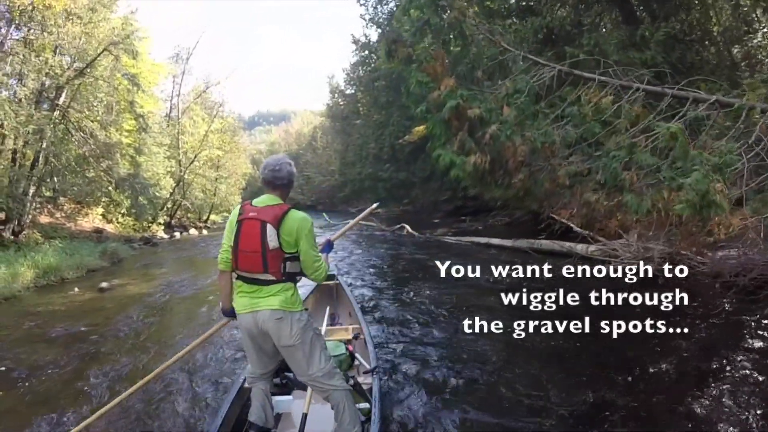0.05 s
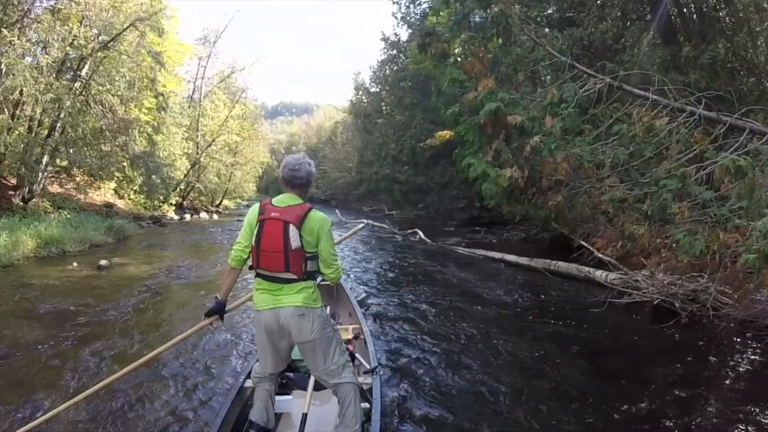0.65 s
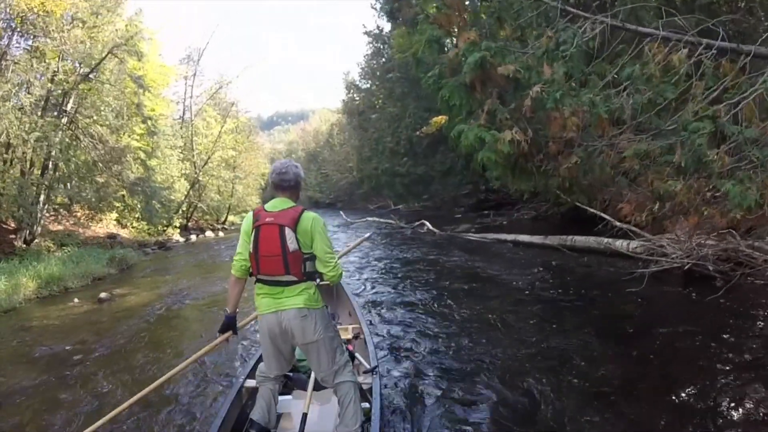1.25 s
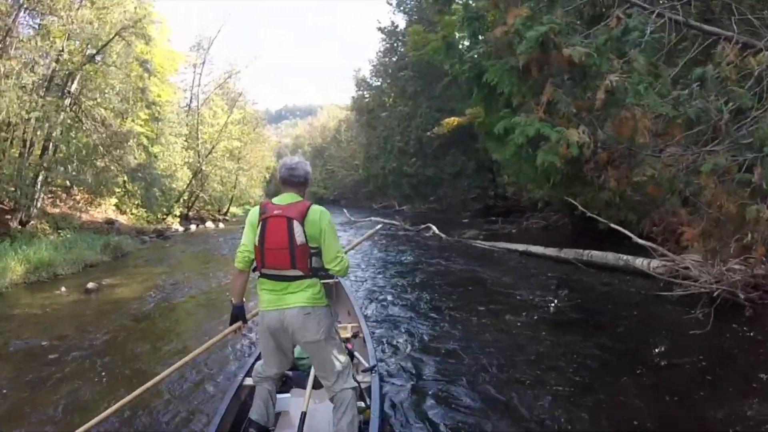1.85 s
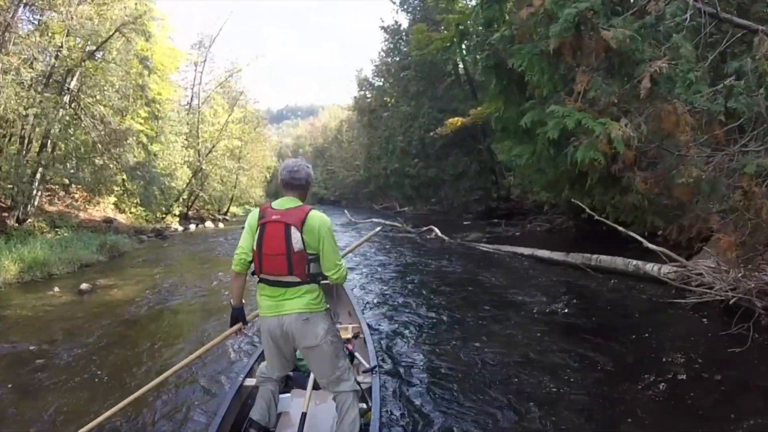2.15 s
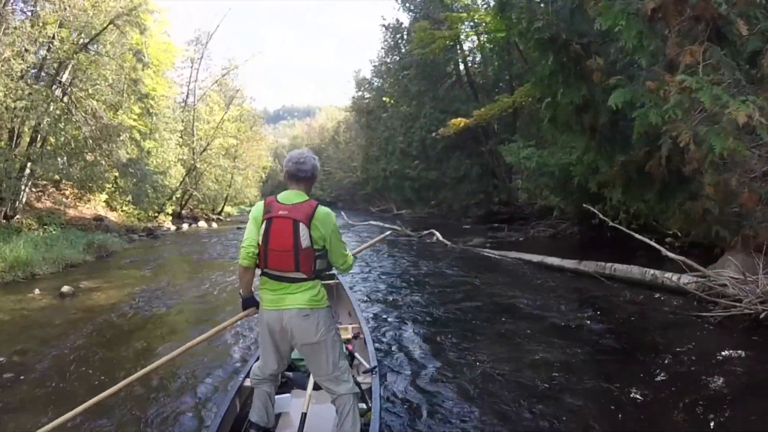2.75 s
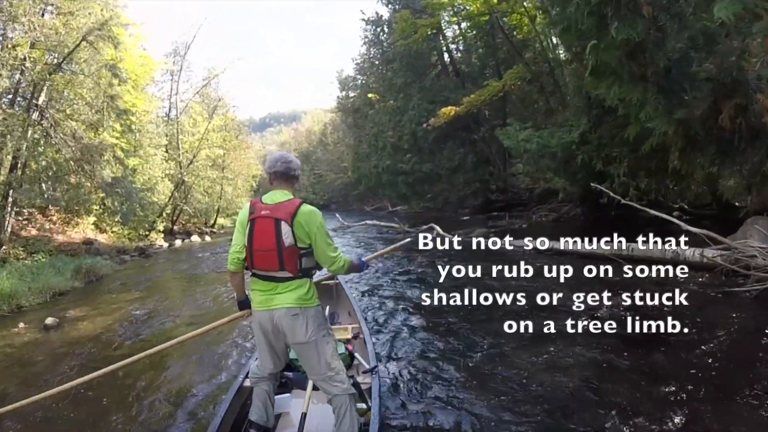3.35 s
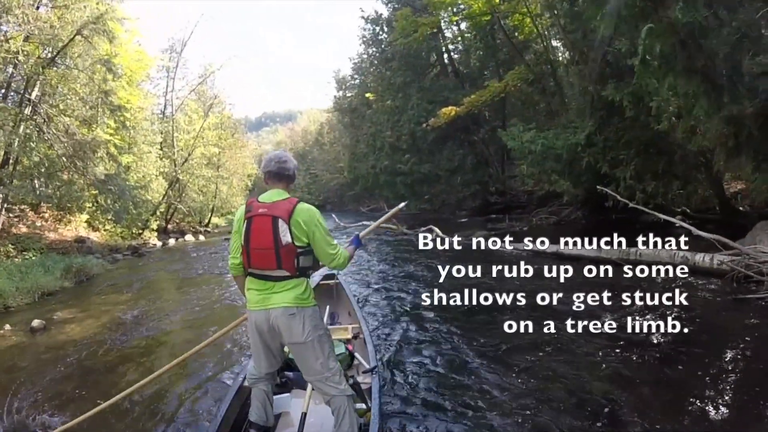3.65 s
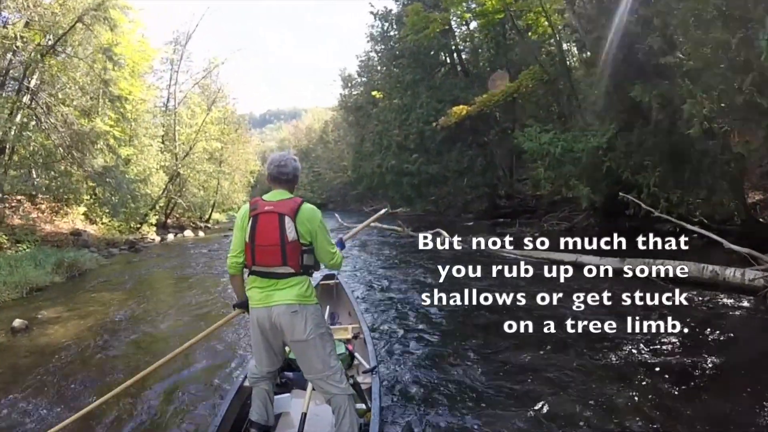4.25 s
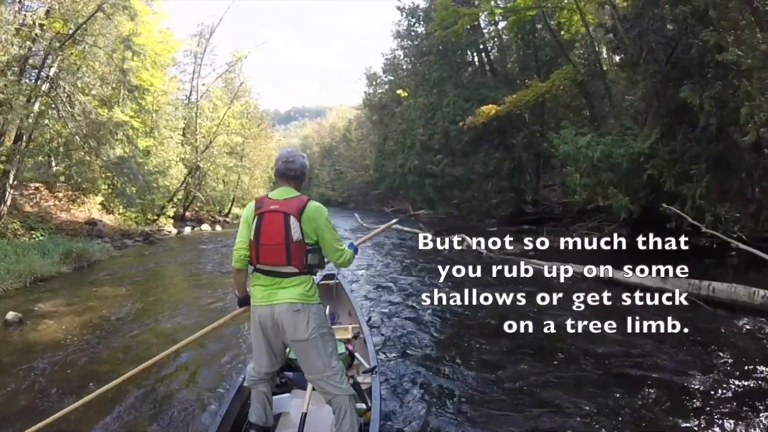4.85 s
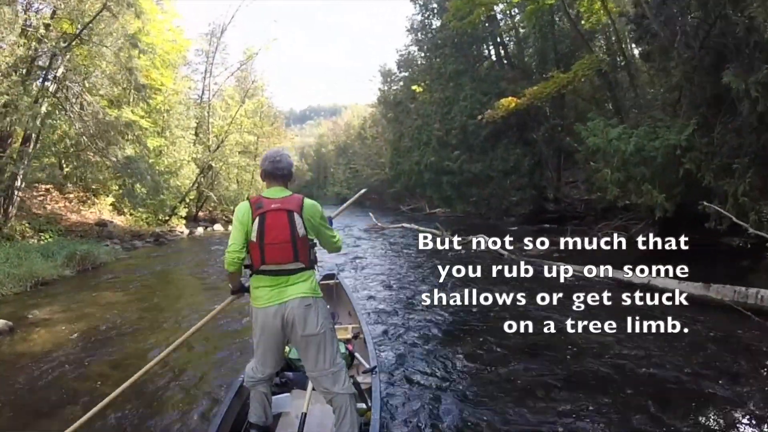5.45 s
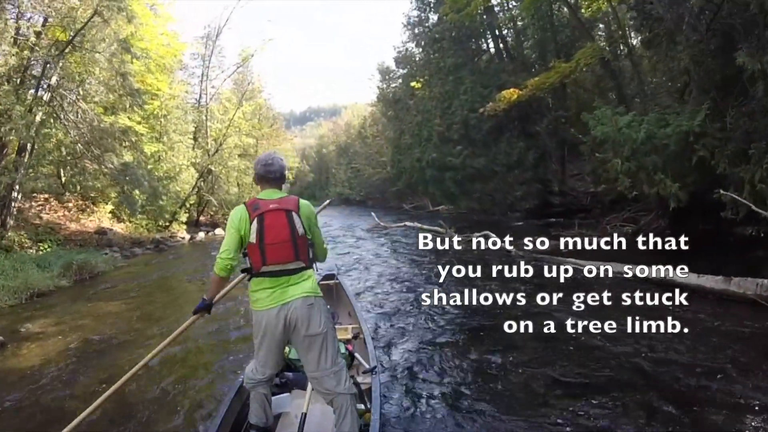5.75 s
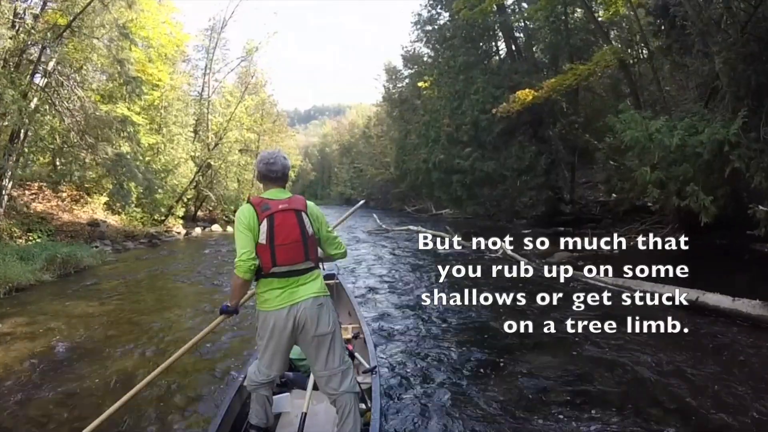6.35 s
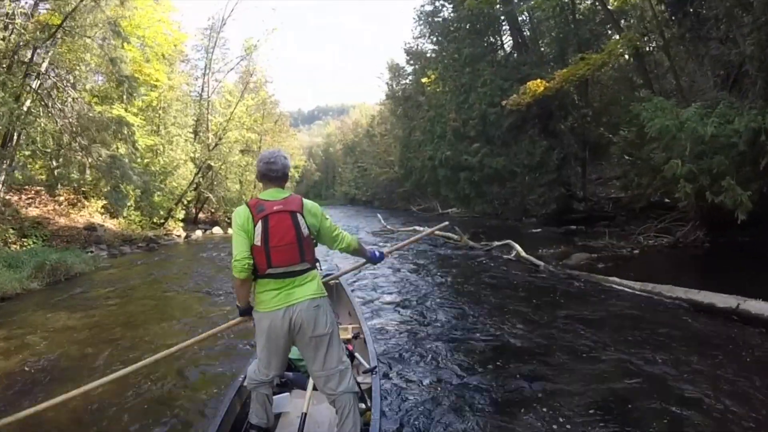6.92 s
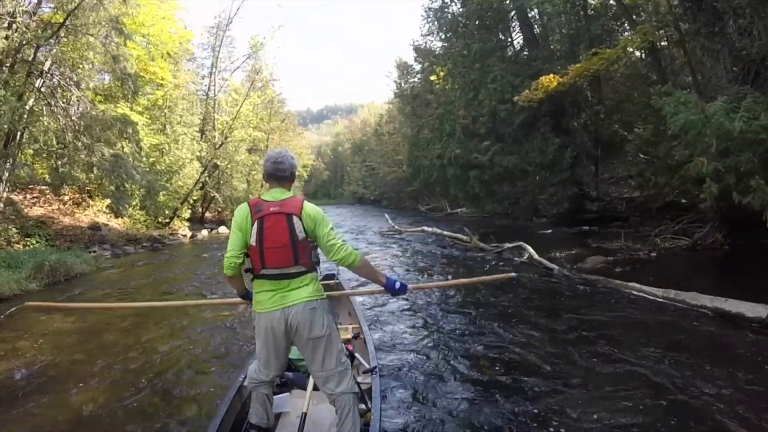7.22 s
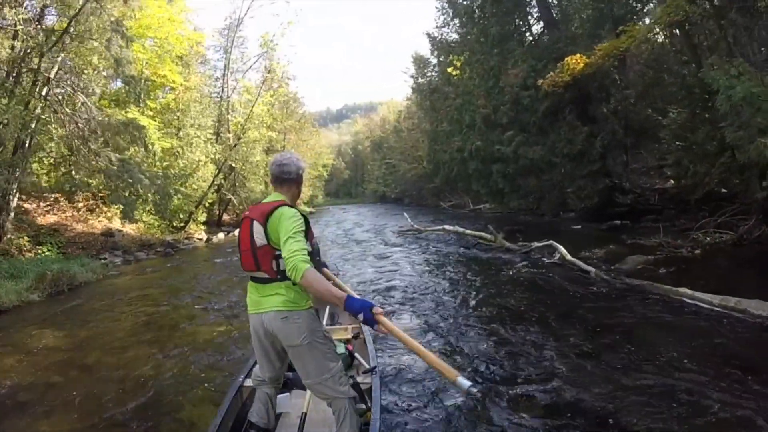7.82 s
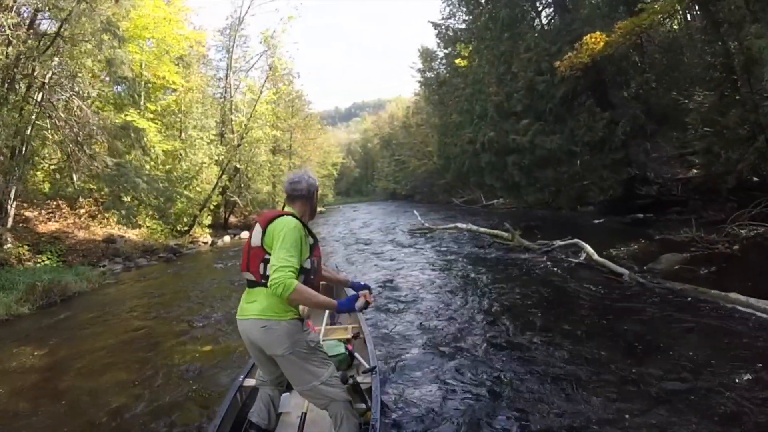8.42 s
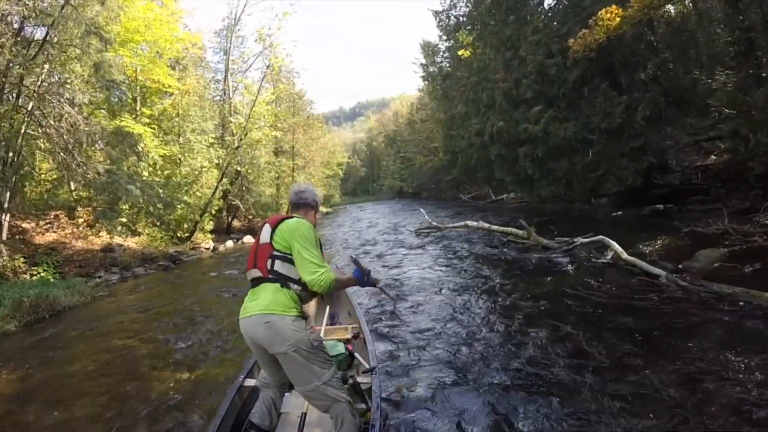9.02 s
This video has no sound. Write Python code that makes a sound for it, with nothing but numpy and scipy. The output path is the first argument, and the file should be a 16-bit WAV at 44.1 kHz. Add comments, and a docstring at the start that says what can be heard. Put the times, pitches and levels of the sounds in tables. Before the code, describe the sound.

A shallow river hisses steadily, heard from the stern of a canoe, while small waves gurgle and plop along the hull. Early on, the bottom rubs over something underwater with a loud groaning scrape and deep, drum-like thumps. Then a pole clacks sharply on stones between more sloshing and light knocks. Soft puffs of wind rumble on the microphone, and near the end the pole raps down on the canoe's rim.

```python
"""A canoe, poled through a shallow riffle, resonates as water, stones and pole strike it.
Heard from the stern, the river hisses all round, and ringing bubbles gurgle along the hull.
Once the hull rubs over something under water: stick-slip friction makes it scrape and groan,
and bumps set its bottom booming like a drum. The pole clacks on stones and is at last laid on
the gunwale; each impact excites the resonances of the bodies that meet."""
import sys
import numpy as np
from scipy import signal
from scipy.fft import rfft, irfft, next_fast_len
from scipy.io import wavfile

SR = 44100
rng = np.random.default_rng(int(sys.argv[2]) if len(sys.argv) > 2 else 0)


def master_out(mix):
    """Clip the mix to full scale and print it as 16-bit PCM to the path in sys.argv[1]."""
    frames = np.transpose(np.atleast_2d(mix))
    ceiling = np.clip(frames, -1, 1)
    pcm = np.round(ceiling * 32767).astype(np.int16)
    wavfile.write(sys.argv[1], SR, pcm)


N = 404838
TIME = np.arange(N) / SR
HIT_TIME = np.arange(SR // 3) / SR

# Noise spectra of the open river, of wavelets slapping the hull and of buffeting air.
# Each row: frequency in Hz, relative spectral density in dB.
RIVER_SPECTRUM = [(20, 3.5), (30, -3), (50, -6), (129, -9), (201, -10), (231, -14), (320, -5), (368, -7.5),
                  (773, -9), (889, -10.5), (1100, -11.5), (2590, -16), (3420, -17), (8090, -29),
                  (11200, -32), (15500, -44)]
SLAP_SPECTRUM = [(35, -39), (51, -22), (68, -6), (95, 8.5), (130, 0), (210, 1), (330, -6.5), (550, -14.5),
                 (1200, -49)]
BUFFET_SPECTRUM = [(12, 2), (25, 0), (45, -24), (90, -41), (250, -67)]
# The flexing bottom of the canoe. Each row: frequency in Hz, gain in dB, 60 dB decay time in seconds.
BOTTOM_MODES = [(52.35, 2, 0.85), (61.4, -25, 0.53), (85.7, -5.5, 0.43), (105.6, -2, 0.12),
                (152, -8, 0.079), (206, -12, 0.14)]
# Resonances of boat and pole. Each row: frequency in Hz, bandwidth in Hz, gain in dB.
PANEL_MODES = [(107, 18, 3.5), (242, 77, -1.5), (326, 135, -7), (503, 36, 0.5), (600, 440, -11),
               (800, 140, -8.5), (971, 37, -8), (1233, 760, -16.5), (1590, 330, -16), (2236, 140, -14.5),
               (2800, 1400, -31), (3730, 380, -34)]   # the stiffer side panels
SHOE_MODES = [(1620, 180, -5), (2460, 270, 3), (3000, 380, -7), (3510, 300, 1.5), (3980, 430, -0.5),
              (4450, 380, -1.5), (6020, 280, -10.5), (6900, 710, -12.5)]   # the pole's shoe on stone
SHAFT_MODES = [(556, 41, -11), (890, 54, -1), (1120, 120, 15), (1690, 44, -17), (1905, 18, 11),
               (2340, 74, 15.5), (3020, 77, 22), (3400, 20, 10.5), (3940, 68, -8), (4480, 93, -21.5),
               (6030, 310, 4), (6700, 210, -5)]
KEEL_GROWL_MODES = [(110, 74, 6.5), (172, 47, 4), (220, 26, 13.5), (350, 230, 1.5), (472, 90, 6.5),
                    (620, 260, -4.5), (804, 110, 0.5), (980, 92, -2), (1350, 750, -16.5)]
KEEL_RASP_MODES = [(1560, 300, -7), (1850, 140, -3), (2350, 200, 3.5), (2644, 150, 4.5), (3790, 440, -8.5)]
GUNWALE_MODES = [(161, 8, 13), (217, 14, 12), (777, 77, 8.5), (1060, 100, -6), (1245, 46, 2.5),
                 (1656, 106, 0.5), (1930, 46, 2), (2230, 48, 8), (2590, 200, -2), (3210, 65, 1),
                 (3500, 96, -2), (3790, 170, -3), (4600, 190, -19)]
# Wavelets running along the hull. Each row: time of the crest in seconds, gurgle gain in dB,
# rumble gain in dB, rise and fall time in seconds.
WAVELETS = [(0.004, -45.5, -42, 0.03), (.13, -57, -42, 0.11), (0.428, -55.5, -38.5, 0.16),
            (0.607, -52.5, -33, 0.097), (0.96, -58.5, -41, 0.16), (2.49, -55, -39.5, 0.17),
            (4.013, -59, -38.5, 0.12), (4.334, -64, -38.5, 0.078), (4.637, -48, -39.5, 0.091),
            (4.826, -52, -34, 0.099), (4.975, -50.5, -38.5, 0.18), (5.277, -60, -50, 0.22),
            (5.514, -66, -39.5, 0.035), (5.737, -61, -44, 0.068), (6.17, -72, -43, 0.088),
            (6.857, -60, -42, 0.042), (8.953, -63, -44.5, 0.77)]
# Blows on the side of the hull. Each row: start in seconds, peak level in dB, lower and upper
# band edge in Hz, contact time in seconds.
KNOCKS = [(.0755, -28, 264, 2800, 0.0099), (.089, -34.5, 400, 2800, 0.0042), (0.395, -41, 250, 2600, 0.011),
          (0.586, -29.5, 198, 2200, 0.0046), (0.9, -36, 200, 1200, 0.0088), (.992, -29, 220, 420, 0.0097),
          (1.659, -19, 350, 640, 0.023), (1.717, -36, 850, 1100, .003), (1.738, -23, 200, 750, 0.0052),
          (1.862, -26.5, 1480, 2600, 0.0051), (1.912, -26.5, 1020, 2670, 0.006),
          (2.0, -28, 394, 600, 0.0085), (4.269, -40, 403, 1400, 0.0091), (4.332, -32, 178, 1780, 0.007),
          (4.765, -33, 500, 840, 0.019), (4.835, -36, 70, 1200, 0.025), (5.057, -35.5, 100, 800, 0.0057),
          (5.08, -24.5, 90, 2940, 0.0075), (6.572, -44, 900, 1300, 0.0046), (7.389, -43, 600, 3000, 0.02),
          (8.038, -39, 180, 890, 0.016), (8.173, -33, 150, 1690, 0.014)]
# Air pockets closing and drops falling in. Each row: start in seconds, peak level in dB,
# starting pitch in Hz, cycles to decay by 60 dB.
PLOPS = [(0.079, -34, 495, 35), (.091, -46, 2320, 50), (.179, -44, 546, 86), (.307, -39, 680, 15),
         (.402, -44, 744, 27), (.423, -48, 2160, 50), (.52, -50, 2240, 60), (0.592, -42.5, 410, 30),
         (0.614, -47, 2200, 60), (0.836, -48, 980, 36), (.87, -49, 1860, 60), (.908, -32, 728, 25),
         (1.001, -34, 530, 14), (2.224, -38, 986, 27), (2.484, -37, 744, 26), (4.333, -40, 1260, 31),
         (4.386, -37, 2010, 31), (4.601, -45, 2040, 30), (4.612, -46, 1200, 26), (4.621, -39, 535, 35),
         (4.639, -44, 2300, 33), (4.657, -35, 620, 28), (4.669, -43, 2210, 42), (4.716, -38, 690, 33),
         (4.7645, -24.5, 620, 8), (4.771, -18, 774, 41), (4.808, -37, 780, 32), (4.955, -42.5, 980, 20),
         (4.98, -41, 482, 36), (5.062, -28.5, 600, 20), (5.084, -29.5, 943, 43), (5.264, -44.5, 935, 43),
         (5.672, -46, 662, 74), (8.045, -41.5, 545, 17)]
# Pushes under the bottom. Each row: time in seconds, impulse in dB, contact time in seconds,
# gain of the higher modes in dB.
BUMPS = [(0.081, -54, 0.0026, 20.5), (1.515, -30, 0.0051, 1), (1.702, -26.5, 0.0016, 5),
         (1.776, -20, 0.0035, 8.5), (1.805, -25, 0.0029, 18), (1.866, -14.5, 0.003, 5),
         (1.927, -19, 0.0023, 6.5), (2.004, -14.5, 0.0028, 2), (2.062, -20.5, 0.0049, 5.5),
         (2.333, -18, 0.0031, 0), (2.756, -50, 0.0023, 11), (5.065, -49, 0.0033, 8),
         (6.86, -56, 0.0035, 14)]
# The pole and loose stones colliding. Each row: start in seconds, peak level in dB, brightest
# frequency in Hz, crunch time in seconds, shaft ring and hull shudder in dB relative to the crack.
CLACKS = [(.36, -43.5, 3850, 0.031, -18, -19), (.385, -38.5, 3620, 0.0075, -17, -9),
          (0.995, -39.5, 3060, 0.0023, -9, -16), (1.8087, -31, 2100, 0.00065, -16, 6.5),
          (1.848, -44, 2700, .002, -5, 2), (1.863, -28.5, 2280, 0.0025, -3, -9),
          (1.907, -36.5, 2880, 0.0022, -9, -16), (1.913, -32.5, 2080, 0.0024, -15, -7.5),
          (2.547, -42.5, 2460, 0.0048, -12, -9), (3.419, -50, 2000, .004, -5, 1),
          (3.6934, -17.5, 3690, 0.003, -15, -15.5), (3.715, -21, 4600, 0.0036, -7, -8.5),
          (3.7427, -22, 4000, 0.0026, -10, -12), (3.839, -35.5, 3330, 0.0043, -20, -5),
          (4.387, -41, 2440, 0.0057, -10, -1), (5.525, -32.5, 3500, .003, 2, -4.5),
          (5.537, -40.5, 2200, 0.0053, -6, -10), (5.663, -45, 3300, .003, -12, -12),
          (5.726, -36.5, 2680, 0.007, 0, -3), (5.856, -42, 4000, 0.0079, -3, -14),
          (6.069, -46, 3980, .004, -14, -16), (6.89, -45.5, 2600, 0.0065, -12, -3),
          (8.663, -36.5, 3430, .002, -10, -11)]
# Puffs of air. Each row: time of the peak in seconds, level in dB, rise and fall time in seconds.
PUFFS = [(1.25, -38, .35), (5.5, -61, .2), (5.92, -40, 0.23), (8.0, -46, 0.3)]
# The keel catching and slipping off. Each row: time of the hardest rub in seconds, level in dB,
# build-up and release in seconds, brightness in Hz (sets the share of growl), relative rasp and grit in dB.
SCRAPES = [(1.545, -39, 0.047, 0.072, 500, -30, -39), (1.666, -32, 0.0085, 0.017, 2400, -4, -30),
           (1.684, -49, .008, 0.0087, 2030, -20, -10), (1.729, -28.5, 0.011, 0.011, 2930, -10, -29.5),
           (1.757, -30.5, 0.0055, 0.0043, 2400, -1, -35), (1.79, -32.5, 0.02, 0.18, 1120, -28, -44),
           (2.004, -25.5, 0.009, 0.0061, 600, -22, -37.5), (2.06, -38, 0.032, .008, 600, -21, -41)]
# The hull flexing. Each row: start in seconds, peak level in dB, first and last pitch in Hz,
# length in seconds.
GROANS = [(1.661, -20, 483, 445, 0.039), (1.731, -29, 818, 797, 0.039), (1.757, -13, 236, 210, 0.016),
          (1.778, -16.5, 225, 161, 0.053), (1.781, -30.5, 518, 373, 0.043), (1.927, -24, 242, 198, 0.013),
          (2.016, -30.5, 498, 409, 0.044), (2.048, -23, 233, 200, 0.012)]
# The pole landing on the gunwale. Each row: time in seconds, peak level in dB, low-pass cutoff in Hz,
# relative ring of the rail in dB.
RAPS = [(8.7944, -19.5, 6900, -1.5), (8.8292, -26, 5600, -3.5), (8.851, -36, 800, -2)]


def from_db(db):
    """Decibels to amplitude ratio."""
    return 10 ** (np.asarray(db) / 20)


def rms_one(x):
    """Scale to rms 1."""
    return x / np.sqrt(np.mean(x ** 2) + 1e-20)


def peak_one(x):
    """Scale to peak 1."""
    return x / np.max(np.abs(x))


def add(out, s, sound):
    """Superpose a sound, starting at s seconds."""
    at = round(s * SR)
    out[at:at + len(sound)] += sound[:N - at]


def delay(hit, s):
    """Delay a short sound by s seconds."""
    return np.interp(HIT_TIME - s, HIT_TIME, hit, left=0)


def cut(x, hz, kind, order=2):
    """Butterworth filter."""
    return signal.sosfilt(signal.butter(order, hz, kind, fs=SR, output="sos"), x + 1e-18)


def drift(hz):
    """Slow random modulation: low-passed noise of rms 1."""
    slow = signal.sosfilt(signal.butter(2, hz, fs=1000, output="sos"), rng.standard_normal(12000))[2000:]
    return np.interp(TIME * 1000, np.arange(len(slow)), rms_one(slow))


def swell(s, rise_s, fall_s):
    """Exponential growth to 1 at s seconds, then exponential decay."""
    return np.exp(-np.minimum(np.maximum((s - TIME) / rise_s, (TIME - s) / fall_s), 50))


def coloured_noise(spectrum):
    """White noise shaped to a spectrum; rms 1."""
    hz, db = np.transpose(spectrum)
    size = next_fast_len(N)
    bin_hz = np.maximum(np.arange(size // 2 + 1) * SR / size, 1)
    gain = from_db(np.interp(np.log(bin_hz), np.log(hz), db))
    return rms_one(irfft(rfft(rng.standard_normal(size)) * gain, size)[:N])


def ring(force, hz, t60):
    """A damped oscillator: a unit impulse starts a sine of height 1 that falls 60 dB in t60 seconds."""
    r, w = from_db(-60 / (t60 * SR)), 2 * np.pi * hz / SR
    return signal.lfilter([0, np.sin(w)], [1, -2 * r * np.cos(w), r * r], force + 1e-18)


def body(force, modes, scatter_db):
    """Modal superposition: each contact point excites the modes with random strengths of its own."""
    out = 0
    for k, (hz, width, db) in enumerate(modes):
        r, w = np.exp(-np.pi * width / SR), 2 * np.pi * hz / SR
        mode = (1 - r * r) / 2 * signal.lfilter([1, 0, -1], [1, -2 * r * np.cos(w), r * r], force + 1e-18)
        out += (-1) ** k * from_db(db + scatter_db * rng.standard_normal()) * mode
    return out


def contact(crunch_s, rattle_db, rattle_s):
    """The force of a rough contact: a short crunch, then a fading rattle."""
    shape = np.exp(-(HIT_TIME / crunch_s) ** np.sqrt(2)) + from_db(rattle_db) * np.exp(-HIT_TIME / rattle_s)
    return shape * rng.choice([-1, 1], len(HIT_TIME))


def grains(per_s, spread_db):
    """A Poisson train of impulses of uneven size."""
    sizes = from_db(spread_db * np.minimum(rng.exponential(1, N), 4)) * rng.choice([-1, 1], N)
    return sizes * (rng.random(N) < per_s / SR)


def slide(first_hz, last_hz, length_s, rough_db, rough_hz):
    """A fading glide, roughened by random amplitude modulation; peak 1."""
    pitch = last_hz + (first_hz - last_hz) * np.maximum(1 - HIT_TIME / length_s, 0)
    fade = (1 - np.exp(-10 * HIT_TIME / length_s)) * np.exp(-(HIT_TIME / length_s) ** 2)
    judder = from_db(rough_db * rms_one(cut(rng.standard_normal(len(HIT_TIME)), rough_hz, "low")))
    return peak_one(fade * judder * np.sin(2 * np.pi * np.cumsum(pitch) / SR))


def bubbles(per_s, first_hz, last_hz, cycles, db_per_octave, spread_db, pitches=24):
    """Bubble resonance: each bubble of a cloud swells and rings down at its own pitch; rms 1."""
    births = grains(per_s * from_db(4 * drift(8.6)), spread_db)
    pitch_index = rng.integers(0, pitches, N)
    cloud = np.zeros(N)
    for k, hz in enumerate(np.geomspace(first_hz, last_hz, pitches)):
        pinch = cut(births * (pitch_index == k), [hz / 1.25, hz * 1.25], "band", order=1)
        cloud += from_db(db_per_octave * np.log2(hz / first_hz)) * ring(pinch, hz, cycles / hz)
    return rms_one(cloud)


def river(level_db=-55.5):
    """Broadband noise is the steady far rush; nearer bubbles resonate as babble, small ones as fizz."""
    rush = coloured_noise(RIVER_SPECTRUM)
    babble = bubbles(600, 455, 4860, cycles=32, db_per_octave=2.5, spread_db=3.5)
    fizz = bubbles(3300, 3460, 3245, cycles=56, db_per_octave=-5, spread_db=9, pitches=8)
    return from_db(level_db) * (rush + from_db(-12) * babble + from_db(-16.5) * fizz)


def spray(level_db=-83):
    """Droplet impact: contacts on the surface are so brief that they give faint, high ticks."""
    droplets = grains(per_s=14, spread_db=1.5)
    ticks = signal.fftconvolve(droplets, contact(0.0011, rattle_db=-30, rattle_s=0.01))[:N]
    return from_db(level_db) * rms_one(cut(ticks, [7500, 12000], "band"))


def wavelet_gains(calm_gurgle_db=-67.5, calm_rumble_db=-48.5):
    """Incoherent sources add in power: wavelets over calm water set the gains of gurgle and rumble."""
    gurgle_power, rumble_power = from_db(calm_gurgle_db) ** 2, from_db(calm_rumble_db) ** 2
    for s, gurgle_db, rumble_db, swell_s in WAVELETS:
        wavelet = swell(s, swell_s, swell_s)
        gurgle_power += (from_db(gurgle_db) * wavelet) ** 2
        rumble_power += (from_db(rumble_db) * wavelet) ** 2
    return np.sqrt(gurgle_power), np.sqrt(rumble_power)


def wash():
    """Forced vibration: wavelets slosh by in a froth of bubbles and drive the sides and the bottom."""
    gurgle_gain, rumble_gain = wavelet_gains()
    froth = cut(bubbles(1100, 456, 2400, cycles=22, db_per_octave=-3, spread_db=3.5), 4200, "low")
    flutter = from_db(3.8 * drift(35))
    panels = body(rng.standard_normal(N), PANEL_MODES, scatter_db=1)
    swish = flutter * rms_one(cut(panels, [600, 3500], "band"))
    push = rng.standard_normal(N)
    drum = rms_one(sum(from_db(db) * ring(push, hz, t60) for hz, db, t60 in BOTTOM_MODES))
    slap = from_db(1.5 * drift(12)) * coloured_noise(SLAP_SPECTRUM)
    gurgle = from_db(-1.5) * froth + from_db(-8) * swish
    rumble = from_db(-13) * drum + from_db(-9.5) * slap
    return gurgle_gain * gurgle + rumble_gain * rumble


def knocks():
    """Impact excitation: the size and hardness of a contact set the band in which the panels ring."""
    out = np.zeros(N)
    for s, db, low_hz, high_hz, contact_s in KNOCKS:
        force = cut(contact(contact_s, rattle_db=-22, rattle_s=0.064), high_hz, "low")
        panels = body(cut(force, low_hz, "high"), PANEL_MODES, scatter_db=2.5)
        add(out, s, from_db(db) * peak_one(panels))
    return out


def plops(rise=0.034, swell_s=0.0049, splash_db=-7, splash_s=0.0055):
    """An air pocket closes with a splash; its resonant frequency rises as it nears the surface."""
    out = np.zeros(N)
    for s, db, hz, cycles in PLOPS:
        t60 = cycles / hz
        pitch = hz * (1 + rise * np.minimum(HIT_TIME / t60 * 3, 2))
        fade = (1 - np.exp(-HIT_TIME / swell_s)) * from_db(-60 * HIT_TIME / t60)
        note = peak_one(fade * np.sin(2 * np.pi * np.cumsum(pitch) / SR))
        splash = cut(contact(splash_s, rattle_db=-20, rattle_s=0.02), [hz / 1.35, hz * 1.35], "band")
        add(out, s, from_db(db) * peak_one(note + from_db(splash_db) * peak_one(splash)))
    return out


def bumps():
    """Soft, heavy pushes excite the bottom's fundamental; off-centre ones favour its higher modes."""
    centred, off_centre = np.zeros(N), np.zeros(N)
    for s, db, contact_s, overtones_db in BUMPS:
        pulse = np.exp(-(2 * (HIT_TIME / contact_s - 1)) ** 2)
        push = -from_db(db) * pulse / pulse.sum()
        add(centred, s - contact_s / 2, push)
        add(off_centre, s - contact_s / 2, from_db(overtones_db) * push)
    return sum(from_db(db) * ring(off_centre if k else centred, hz, t60)
               for k, (hz, db, t60) in enumerate(BOTTOM_MODES))


def clacks(chirp_db=-9, hull_lag_s=0.0018):
    """Impact on stone rings shoe, shaft and then hull; hard hits send a bending wave down the shaft."""
    out = np.zeros(N)
    hardest_db = max(row[1] for row in CLACKS)
    for s, db, hz, crunch_s, shaft_db, hull_db in CLACKS:
        force = contact(crunch_s, rattle_db=-20, rattle_s=0.023)
        crack = cut(body(force, SHOE_MODES, scatter_db=1), [hz / 1.4, hz * 1.4], "band", order=1)
        shaft = cut(body(force, SHAFT_MODES, scatter_db=1.5), hz, "low", order=1)
        shudder = body(contact(0.015, rattle_db=-12, rattle_s=0.079), PANEL_MODES, scatter_db=2.5)
        hull = delay(cut(shudder, 750, "high", order=1), hull_lag_s)
        chirp = slide(hz, 0.82 * hz, length_s=0.015, rough_db=6, rough_hz=1200)
        clack = peak_one(crack) + from_db(shaft_db) * peak_one(shaft) + from_db(hull_db) * peak_one(hull)
        clack += from_db(chirp_db + db - hardest_db) * chirp
        add(out, s, from_db(db) * peak_one(cut(clack, 7100, "low", order=6)))
    return out


def breeze():
    """Pressure fluctuations in puffs of air buffet the microphone with a deep rumble."""
    puffs = sum(from_db(db) * swell(s, swell_s, swell_s) for s, db, swell_s in PUFFS)
    return puffs * coloured_noise(BUFFET_SPECTRUM)


def scrapes(full_growl_hz=3000):
    """Stick-slip friction over grit: hard rubbing makes the keel growl and rasp, light rubbing rumbles."""
    slips = grains(per_s=1600, spread_db=2.5) * from_db(3 * drift(90))
    growl = rms_one(cut(body(slips, KEEL_GROWL_MODES, scatter_db=1), 1700, "low"))
    rumble = cut(growl, 480, "low")
    rasp = rms_one(cut(body(slips, KEEL_RASP_MODES, scatter_db=2.5), [1300, 3800], "band"))
    grit = cut(grains(per_s=3500, spread_db=3.5), 2900, "high")
    grit = rms_one(cut(grit, 6500, "low", order=1))
    out = np.zeros(N)
    for s, db, build_s, release_s, brightness_hz, rasp_db, grit_db in SCRAPES:
        keel = rumble + brightness_hz / full_growl_hz * (growl - rumble)
        rub = keel + from_db(rasp_db) * rasp + from_db(grit_db) * grit
        out += from_db(db) * swell(s, build_s, release_s) * rub
    return out


def groans():
    """Flexure under load: the hull gives way in juddering notes that sink in pitch as it lets go."""
    out = np.zeros(N)
    for s, db, first_hz, last_hz, length_s in GROANS:
        add(out, s, from_db(db) * slide(first_hz, last_hz, length_s, rough_db=5, rough_hz=130))
    return out


def keel_ping(start_s=1.758, db=-42.5, hz=1920, t60=0.19):
    """Free vibration: the keel strip springs clear and rings down at one frequency."""
    out = np.zeros(N)
    add(out, start_s, from_db(db - 60 * HIT_TIME / t60) * np.sin(2 * np.pi * hz * HIT_TIME))
    return out


def raps(skid_s=0.0018, lead_s=0.01, crack_db=-1):
    """The shaft skids onto the gunwale with a crack; its bouncing excites the modes of the rail."""
    out = np.zeros(N)
    for s, db, cutoff_hz, rail_db in RAPS:
        skid = np.exp(-np.abs(HIT_TIME - lead_s) / skid_s) * rng.choice([-1, 1], len(HIT_TIME))
        crack = peak_one(cut(skid, [2500, 4500], "band"))
        strike = peak_one(cut(body(skid, GUNWALE_MODES, scatter_db=3.5), 2800, "high"))
        chatter = contact(0.013, rattle_db=-19, rattle_s=0.15)
        rail = peak_one(body(chatter, GUNWALE_MODES, scatter_db=1.5))
        rail = delay(cut(rail, 4800, "low", order=1), lead_s)
        rap = peak_one(strike + from_db(crack_db) * crack) + from_db(rail_db) * rail
        add(out, s - lead_s, from_db(db) * peak_one(cut(rap, cutoff_hz, "low")))
    return out


def gain_control(x, threshold_db=-26, share=0.26, averaging_s=0.13):
    """Compression: a share of the running level's excess over the threshold is taken off."""
    r = np.exp(-1 / (averaging_s * SR))
    level_db = 10 * np.log10(signal.lfilter([1 - r], [1, -r], x ** 2) + 1e-12)
    return x * from_db(-share * np.maximum(level_db - threshold_db, 0))


def scene():
    """Superposition: water, air, boat and pole add in one channel."""
    water_and_air = river() + spray() + breeze() + wash() + plops()
    boat = scrapes() + groans() + keel_ping() + bumps() + knocks()
    pole = clacks() + raps()
    return (water_and_air + boat + pole)[None]


def record(dry, low_hz=21.7, high_hz=15400):
    """Band limiting and compression: the deepest bass and the top are cut; the gain dips under the boom."""
    heard = gain_control(cut(dry, low_hz, "high"))
    return signal.sosfilt(signal.ellip(10, 0.1, 80, high_hz, fs=SR, output="sos"), heard)


dry = scene()
out = record(dry)
master_out(out)
```